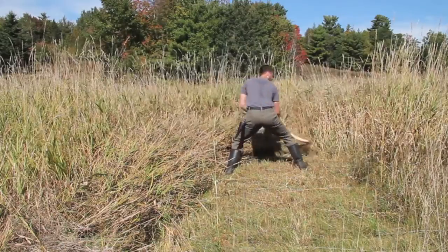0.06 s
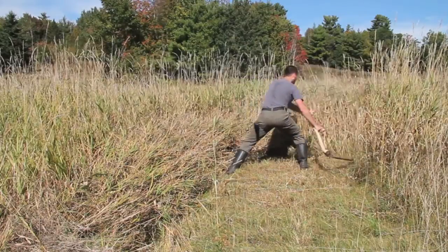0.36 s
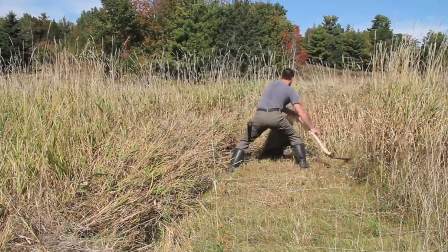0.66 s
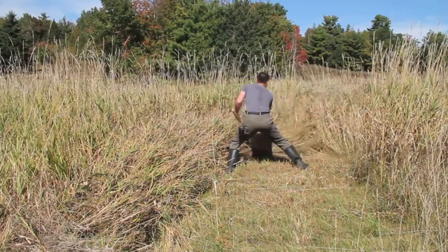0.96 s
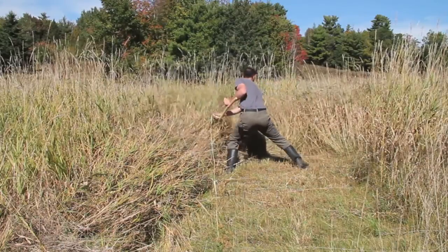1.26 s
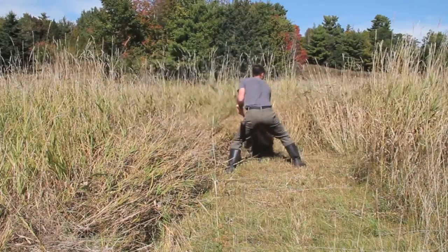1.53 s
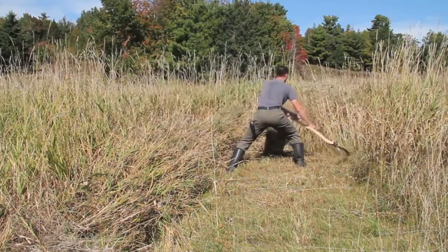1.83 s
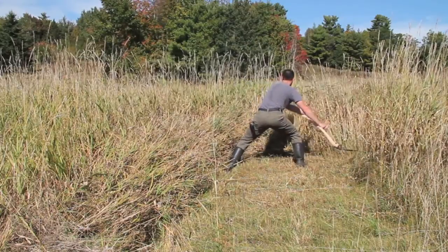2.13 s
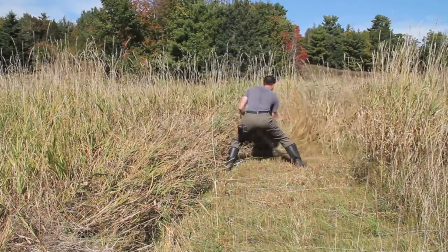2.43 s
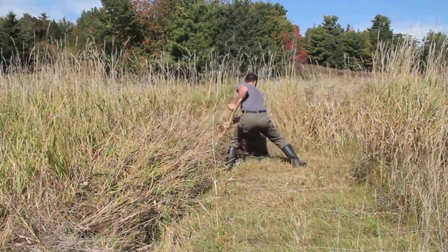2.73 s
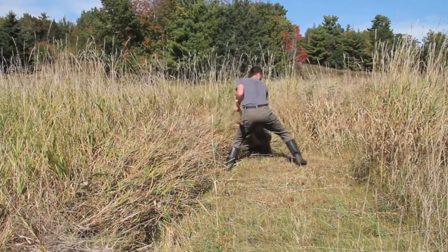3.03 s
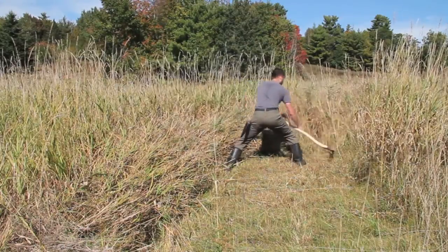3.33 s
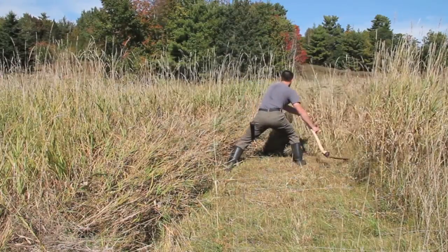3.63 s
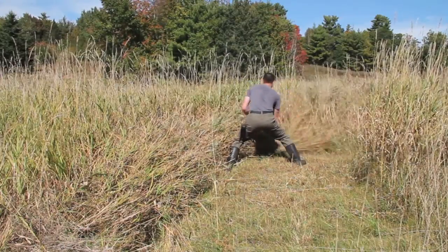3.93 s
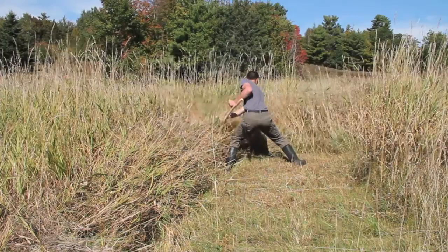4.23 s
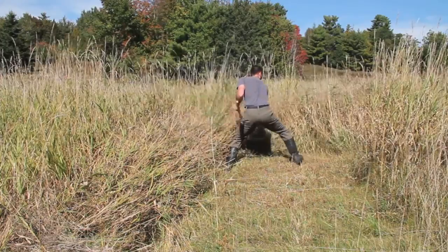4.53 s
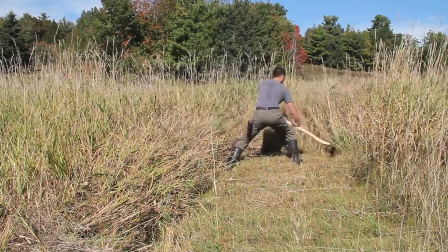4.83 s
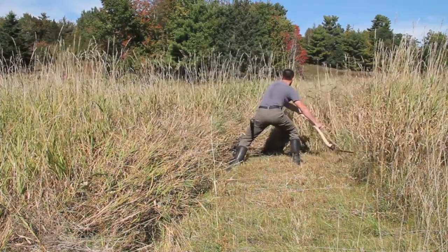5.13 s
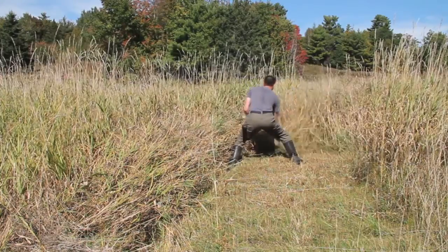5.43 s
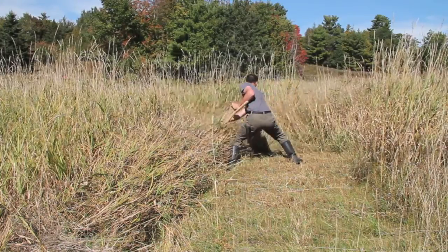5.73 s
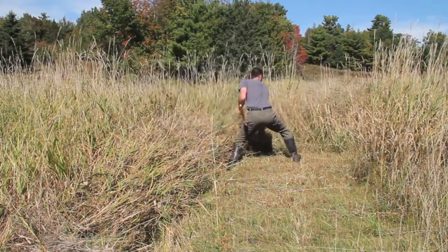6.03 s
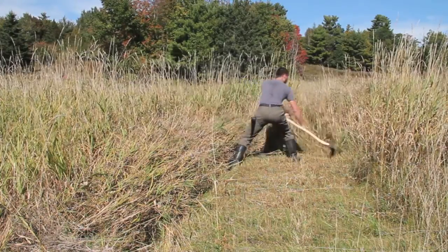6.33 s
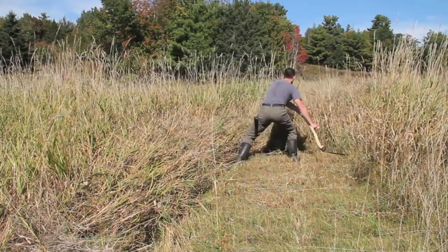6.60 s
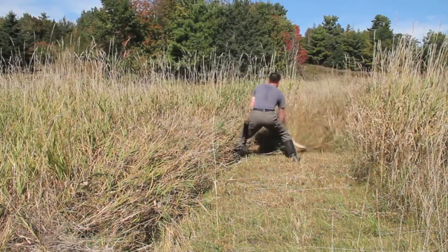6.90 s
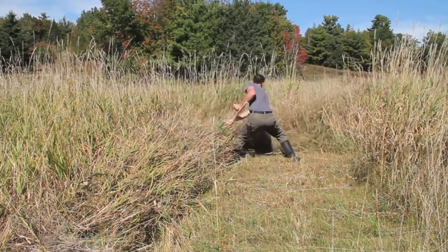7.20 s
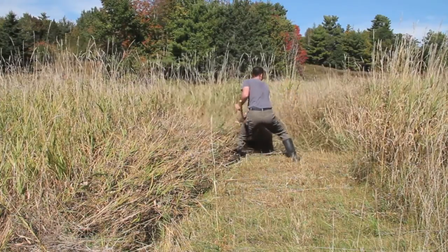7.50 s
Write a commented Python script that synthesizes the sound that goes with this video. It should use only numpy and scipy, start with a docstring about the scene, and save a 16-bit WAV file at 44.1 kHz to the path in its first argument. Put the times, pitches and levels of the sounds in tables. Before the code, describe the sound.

A scythe cuts through tall dry grass in five steady, crackling swishes, with softer rustling as the blade is drawn back.

```python
"""Mowing dry grass with a scythe

Five strokes cut tall dry grass in an open field, heard in mono from a few metres behind the mower.
In each stroke the blade rips through hundreds of stalks, which tug at their roots and make the steel
ring faintly. The cut grass rustles down, and the blade is drawn back over the stubble.
The wooden handle knocks now and then, a light wind touches the microphone and something hums far away."""
import sys
import numpy as np
from scipy import signal
from scipy.io import wavfile
from scipy.ndimage import uniform_filter1d

SR = 44100
rng = np.random.default_rng(int(sys.argv[2]) if len(sys.argv) > 2 else 0)


def transcribe(signal):
    """Save signal, clipped to [-1, 1], as a 16-bit WAV file at the path in sys.argv[1]."""
    frames = np.atleast_2d(signal).T
    limited = np.clip(frames, -1, 1)
    pcm = np.round(limited * 32767).astype(np.int16)
    wavfile.write(sys.argv[1], SR, pcm)


N = 333396
TIME = np.arange(N) / SR

# The cutting strokes. Each row: start, rise time and time in the grass in seconds; levels of ripping,
# root tugging and rustling in dB; seconds until the cut grass has fallen; its fading in dB per second.
STROKES = [(0.684, 0.23, 0.38, -36.5, -46.5, -32, 0.52, 33), (2.25, 0.1, 0.48, -38, -46.5, -33.5, 0.49, 66),
           (3.723, 0.33, 0.46, -37.8, -48.5, -30.5, 0.5, 37.5),
           (5.284, 0.13, 0.42, -37, -47, -34.5, 0.47, 53), (6.775, 0.2, 0.5, -39, -50, -33.5, 0.51, 64)]
# Thick clumps (+) and thin patches (-). Each row: time and half width in seconds, level change in dB.
CLUMPS = [(0.789, 0.0066, 5), (0.979, 0.011, 0), (1.045, 0.013, 2), (2.325, 0.057, 2), (2.482, 0.048, -3),
          (2.562, 0.026, 1.6), (2.627, 0.01, 3), (2.717, 0.026, -2), (3.915, 0.018, 7), (3.969, 0.018, 3),
          (4.077, 0.0064, 4), (4.134, 0.048, -3), (5.364, 0.015, 4.5), (5.615, 0.037, 4), (5.727, 0.036, 4),
          (7.085, 0.018, -2), (7.138, 0.015, 2.5), (7.188, 0.023, -2)]
# Tufts jerking at their roots. Each row: time in seconds, peak level in dB, pitch in Hz.
TUFTS = [(0.885, -42, 230), (2.404, -43, 242), (2.615, -35.5, 295), (2.664, -35, 295), (2.738, -38, 527),
         (3.978, -39, 332.6), (4.025, -41.5, 240), (4.068, -36.5, 330), (4.189, -40, 306), (7.03, -42, 250),
         (7.234, -39, 266), (7.31, -43, 260)]
# Thick stalks splintering. Each row: time in seconds, peak level in dB, pitch in Hz.
CRACKS = [(0.7813, -33, 3050), (0.9714, -20, 6550), (0.9823, -21, 4600), (1.04, -20, 2980),
          (2.3094, -26.5, 2420), (2.6664, -25, 8070), (3.907, -35, 4710), (4.0533, -23, 2980),
          (4.074, -20.5, 3140), (4.884, -28.5, 4270), (5.415, -20, 7440), (5.42, -24, 8090),
          (5.4613, -23, 5390), (5.607, -18, 7600), (5.6917, -26, 3060), (5.7129, -20, 5230),
          (7.028, -25, 4000), (7.046, -22, 3240), (7.083, -27, 3320), (7.117, -25, 2940),
          (7.14, -25.5, 2180)]
# Brittle stems snapping clean through. Each row: time in seconds, peak level in dB, pitch in Hz.
SNAPS = [(0.8726, -15.5, 5000), (2.2878, -18, 5500), (3.068, -22, 9300), (3.863, -22, 8500),
         (4.022, -25, 5500), (4.0358, -16, 6460), (6.4541, -4.5, 8800), (6.983, -6, 7400)]
# The blade is drawn back. Each row: start and length in seconds, rustle and sliding levels in dB.
RETURNS = [(-0.152, 0.52, -40.5, -52), (1.373, 0.46, -41.5, -54.5), (2.875, 0.35, -41.5, -60),
           (3.248, 0.26, -40.5, -51.5), (4.36, 0.63, -43, -57.5), (5.808, 0.69, -42, -53.5),
           (7.327, 0.3, -41, -54)]
# The scythe sweeps past standing grass. Each row: time and half width in seconds,
# then rustle level, change of its top treble and sliding level, all in dB.
BRUSHES = [(0.228, 0.018, -40.5, 3, -48), (1.729, 0.082, -40.5, 5, -68), (1.914, 0.084, -59, 0.3, -51),
           (2.153, 0.072, -53, 3, -59), (3.076, 0.047, -49, 2, -51), (3.434, 0.047, -43.1, 3, -50),
           (4.736, 0.072, -36.5, 4, -68), (4.888, 0.059, -40.5, -6, -48.5), (4.959, 0.044, -49.7, -6, -47),
           (5.094, 0.046, -49, 3, -55.4), (6.253, 0.048, -39.5, -1, -67), (6.74, 0.12, -47.5, 4, -57)]
# The blade skims the stubble on its way into the grass. Each row: time in seconds, level in dB.
ENTRIES = [(0.756, -56), (2.262, -52), (3.801, -49), (5.326, -46.5), (6.842, -45)]
# The tones at which the steel rings. Each row: pitch in Hz, width in Hz, level in dB.
BLADE_TONES = [(909, 21, 3), (1056, 91, -0.5), (1540, 62, 1), (1823, 59, 1), (2000, 12, -9.5),
               (2435, 67, -5), (3050, 100, -9), (3927, 66, 0.5), (4520, 25, -1)]
# The blade taps something hard. Each row: time in seconds, peak level in dB, rough pitch in Hz.
CLINKS = [(0.3467, -31.5, 2260), (0.734, -42, 4650), (0.785, -43, 3000), (2.333, -30, 3950),
          (2.669, -34, 3200), (3.763, -46, 4540), (3.806, -41, 1540), (3.911, -33, 2450),
          (4.955, -37, 3500), (5.312, -42, 1770), (5.358, -32, 2130), (5.415, -27, 3900),
          (5.524, -36, 1570), (5.645, -34, 1060), (6.474, -44, 2000), (6.834, -41, 3100)]
# Knocks of the handle. Each row: time in seconds, strength in dB, pitch in Hz, fade time in cycles.
KNOCKS = [(0.1902, -29.5, 392, 0.21), (1.568, -41, 425, 0.78), (3.237, -47, 500, 0.33),
          (3.345, -41, 1000, 0.61), (6.208, -48, 382, 0.6)]
# Gusts on the microphone. Each row: start, rise time and length in seconds, level in dB.
GUSTS = [(0.25, 0.1, 0.14, -75), (2.25, 0.12, 0.51, -80), (3.5, 0.2, 0.45, -71), (2.8, 0.19, 0.5, -69),
         (5.3, 0.13, 0.7, -79), (6.08, 0.06, 0.12, -63), (6.6, 0.04, 0.09, -55), (6.88, 0.24, 0.66, -52.5)]
# Single puffs of wind. Each row: time in seconds, peak level in dB, pitch in Hz, fade time in cycles.
PUFFS = [(2.865, -56, 69.6, 0.3), (3.23, -52, 65.4, 0.52), (3.283, -53, 95, 0.36), (3.76, -54, 46, 0.28),
         (6.135, -52, 83, 0.25), (6.618, -46, 119, 0.44), (7.131, -39, 100, 0.35),
         (7.184, -38.5, 130, 0.43), (7.488, -47, 91, 0.49)]

# A colour says how strong a noise is from bass to treble. Each row: frequency in Hz, level in dB.
RIP_COLOUR = [(300, 0.5), (700, -2), (1200, -2), (1800, 2), (3200, 2.5), (5000, 3.5), (8000, -5),
              (15000, -3.5)]   # tearing stalks
TUG_COLOUR = [(70, -18), (150, -9.5), (230, 4), (300, -4), (450, 1.5), (700, 1.5), (1500, -35)]   # pulled roots
RUSTLE_COLOUR = [(200, -40), (600, -15), (1500, -9.5), (3000, -4), (5000, -1.5), (8200, 0.5), (10500, -3.5),
                 (14000, -7.5), (16000, -3)]   # dry leaves touching
SLIDE_COLOUR = [(150, -9), (400, -3), (800, -10.5), (1600, 0.5), (3000, -3.5), (6000, -4), (15000, -37)]   # steel on stubble
WIND_COLOUR = [(22, -17), (50, 11), (95, 3), (160, -1.5), (300, -30), (600, -39)]   # air on the microphone
FIELD_COLOUR = [(40, -26), (90, 2), (150, -1.5), (280, -2), (600, 1.5), (1300, -1), (2500, -11.5),
                (8000, -6.5), (16000, -16.5)]   # the hush of the field


def cutting():
    """Stalks tear and pop in quick bunches and set the blade ringing; each bunch plucks at the turf."""
    bites, pulls = [], []
    for start, rise_s, length_s, rip_db, tug_db, *_ in STROKES:
        bites.append(from_db(rip_db) * movement(start, rise_s, length_s, fade_db_per_s=139))
        # The roots are only pulled once the blade has bitten fully, so this rises later.
        pulls.append(from_db(tug_db) * movement(start, rise_s, length_s, fade_db_per_s=343, curve=1.76))
    thickness = from_db(thickness_db())
    late_breaks = [from_db(-19) * gain for _, gain in falling_grass()]   # stalks break as they fall
    rip_gain = together([together(bites) * thickness] + late_breaks)
    tug_gain = together(pulls) * thickness
    rips = crackle(RIP_COLOUR, per_s=1100, spread_db=3, colour_db=17, decay_s=0.0015, even_s=0.087)
    pops = straw_pops(low_hz=1000, high_hz=5500, per_s=200, sharpness=91, spread_db=3, pitches=44)
    blade = rips + from_db(-6.5) * pops + from_db(-7) * rms_one(steel(rips))
    tugs = crackle(TUG_COLOUR, per_s=320, spread_db=2.5, colour_db=2.5, decay_s=0.0027, even_s=0.04)
    turf = tugs + from_db(0.5) * resonance(tugs, hz=330, width_hz=70)
    jerks = thuds([(start, db, hz, 0.76) for start, db, hz in TUFTS])   # fade time: 0.76 cycles
    return rip_gain * rms_one(blade) + tug_gain * rms_one(turf) + jerks


def straw_pops(low_hz, high_hz, per_s, sharpness, spread_db, pitches):
    """Each hollow straw pops at the pitch of its own tube as it is cut."""
    sizes = from_db(spread_db * np.minimum(rng.exponential(1, N), 3)) * rng.choice([-1, 1], N)
    pops = sizes * (rng.random(N) < per_s / SR)
    tube = rng.integers(0, pitches, N)
    rings = sum(resonance(pops * (tube == k) + 1e-18, hz, hz / sharpness) / np.sqrt(hz)
                for k, hz in enumerate(np.geomspace(low_hz, high_hz, pitches)))
    return evened(rings, even_s=0.097)


def thickness_db():
    """How much grass the blade meets, in dB above or below evenly grown grass."""
    return sum(db * bump(centre, half_width_s) for centre, half_width_s, db in CLUMPS)


def falling_grass():
    """Cut grass moves just after the first stalks break, then settles. Gives (start, gain) per stroke."""
    thickness = from_db(0.86 * thickness_db())
    return [(start, thickness * from_db(db) * movement(start, rise_s, fall_s, fade, curve=1.39))
            for start, rise_s, _, _, _, db, fall_s, fade in STROKES]


def rustle():
    """Thousands of light touches a second merge to a hiss; the finest leaves add the top treble."""
    # Each stir is a gain and a treble change in dB. Cut grass starts dull and brightens as it falls.
    stirs = [(gain, np.interp(TIME, [start, start + 0.55], [-4.5, 2.4]))
             for start, gain in falling_grass()]
    stirs += [(from_db(db) * movement(start, 0.13, length_s, fade_db_per_s=91), 1)
              for start, length_s, db, _ in RETURNS]
    stirs += [(from_db(db) * bump(centre, half_width_s), top_db)
              for centre, half_width_s, db, top_db, _ in BRUSHES]
    stirs += [(from_db(-55), -0.5)]   # the standing grass never quite stops stirring
    body_gain = together(gain for gain, _ in stirs)
    top_gain = together(gain * from_db(top_db) for gain, top_db in stirs)
    touches = crackle(RUSTLE_COLOUR, per_s=14000, spread_db=1.5, colour_db=5,
                      decay_s=0.00016, even_s=0.072)
    top = signal.sosfiltfilt(signal.butter(3, 10000, "high", fs=SR, output="sos"), touches)
    return body_gain * (touches - top) + top_gain * top


def cracks(decay_s, reach_octaves):
    """A thick stalk splinters for a few milliseconds around a pitch of its own."""
    out, t = np.zeros(N), TIME[:SR // 20]
    for start, db, hz in CRACKS:
        splinters = rng.standard_normal(len(t)) * np.exp(-t / decay_s)
        crack = band(splinters, hz / 2 ** reach_octaves, hz * 2 ** reach_octaves, order=1)
        add(out, start, from_db(db) * peak_one(crack))
    return out


def snaps(scatter_db, scatter_s):
    """A brittle stem gives one sharp pulse, which scatters off the ground and the stalks around."""
    out, t = np.zeros(N), TIME[:SR // 30]
    for start, db, hz in SNAPS:
        pulse = from_db(scatter_db) * rng.standard_normal(len(t)) * np.exp(-t / scatter_s)
        pulse[0] = 1
        snap = band(pulse, hz * 0.56, hz * 1.5, order=1)
        add(out, start, from_db(db) * peak_one(band(snap, 530, 11100, order=5)))
    return out


def sliding():
    """The back of the blade flicks over the stubble and rings a little."""
    slides = [from_db(db) * movement(start, 0.13, length_s, fade_db_per_s=68)
              for start, length_s, _, db in RETURNS]
    slides += [from_db(db) * bump(centre, half_width_s) for centre, half_width_s, _, _, db in BRUSHES]
    slides += [from_db(db) * bump(centre, half_width_s=0.025) for centre, db in ENTRIES]
    flicks = crackle(SLIDE_COLOUR, per_s=1200, spread_db=0, colour_db=2.5, decay_s=0.0023, even_s=0.065)
    ringing = from_db(-17) * rms_one(steel(flicks))
    return together(slides) * rms_one(flicks + ringing)


def clinks(reach_octaves, scrape_db, scrape_s):
    """A tap with a short scrape; where it lands decides which tones of the blade ring most."""
    out, t = np.zeros(N), TIME[:SR // 8]
    for start, db, hz in CLINKS:
        contact = from_db(scrape_db) * rng.standard_normal(len(t)) * np.exp(-t / scrape_s)
        contact[0] = 1
        push = band(contact, hz / 2 ** reach_octaves, hz * 2 ** reach_octaves)
        add(out, start, from_db(db) * peak_one(steel(push)))
    return out


def steel(push):
    """A push makes the blade ring at its own tones."""
    return sum(from_db(db) * resonance(push, hz, width_hz) for hz, width_hz, db in BLADE_TONES)


def handle():
    """The wooden handle knocks hollowly; it is too slim to give off deep bass."""
    return band(thuds(KNOCKS), low_hz=150, high_hz=3000)


def wind():
    """Moving air rumbles and thumps on the microphone, with a light breeze between the gusts."""
    gusts = [from_db(db) * movement(start, rise_s, length_s, fade_db_per_s=180)
             for start, rise_s, length_s, db in GUSTS]
    breeze = from_db(-80.5)
    rumble = crackle(WIND_COLOUR, per_s=120, spread_db=9, colour_db=-10, decay_s=0.01, even_s=0.094)
    return together(gusts + [breeze]) * rumble + thuds(PUFFS)


def field_hush():
    """The open field gives a soft, steady noise."""
    hush = sum(gain * band(rng.standard_normal(N), low, high) for low, high, gain in thirds(FIELD_COLOUR))
    return from_db(-57.5) * rms_one(hush)


def distant_hum(hz, width_hz):
    """A faint, wavering low tone comes from beyond the field."""
    tone = resonance(rng.standard_normal(N), hz, width_hz)
    return from_db(-79.5) * rms_one(resonance(tone, hz, width_hz))


def crackle(colour, per_s, spread_db, colour_db, decay_s, even_s):
    """A shower of tiny noise bursts; spread_db varies their size, colour_db each band within a burst."""
    starts = np.flatnonzero(rng.random(N) < per_s / SR)
    size_db = spread_db * np.minimum(rng.exponential(1, N), 4)[starts]
    kept = np.exp(-2 / (decay_s * SR))   # share of the energy left after one sample
    out = 0
    for low, high, gain in thirds(colour):
        energy = np.zeros(N)
        energy[starts] = from_db(size_db + colour_db * rng.uniform(-1.53, 1, N)[starts]) ** 2
        energy = signal.lfilter([1], [1, -kept], energy + 1e-18)
        out = out + gain * band(np.sqrt(energy) * rng.standard_normal(N), low, high)
    return evened(out, even_s)


def thuds(table):
    """Soft blows that swell and die within a few cycles."""
    out, t = np.zeros(N), TIME[:SR // 8]
    for start, db, hz, cycles in table:
        blow = np.sin(2 * np.pi * hz * t) * t ** 2 * np.exp(-t * hz / cycles)
        add(out, start, from_db(db) * peak_one(blow))
    return out


def movement(start, rise_s, length_s, fade_db_per_s, curve=1):
    """The gain of one movement: it gathers speed, holds, and dies away after its length."""
    t = TIME - start
    rise = np.clip(t / rise_s, 0, 1) ** curve
    fade_db = np.minimum(fade_db_per_s * np.maximum(t - length_s, 0), 200)
    return rise * from_db(-fade_db)


def bump(centre, half_width_s):
    """A bell-shaped swell of height 1."""
    return np.exp(-np.minimum(((TIME - centre) / half_width_s) ** 2, 50))


def thirds(colour):
    """Split a colour into bands a third of an octave wide: low edge in Hz, high edge in Hz, gain."""
    hz, db = np.transpose(colour)
    edges = 20 * 2 ** (np.arange(30) / 3)
    centres = np.sqrt(edges[:-1] * edges[1:])
    gains = from_db(np.interp(np.log(centres), np.log(hz), db))
    return [(low, high, gain) for low, high, gain in zip(edges, edges[1:], gains)
            if high > hz[0] and low < hz[-1]]


def band(x, low_hz, high_hz, order=2):
    """Let through what lies between two frequencies."""
    sos = signal.butter(order, [low_hz, min(high_hz, .45 * SR)], "band", fs=SR, output="sos")
    return signal.sosfilt(sos, x + 1e-18)


def resonance(x, hz, width_hz):
    """Ring at one pitch; the smaller the width, the longer the ring."""
    r = np.exp(-np.pi * width_hz / SR)
    feedback = [1, -2 * r * np.cos(2 * np.pi * hz / SR), r * r]
    return signal.lfilter(np.array([1, 0, -1]) * (1 - r * r) / 2, feedback, x)


def together(gains):
    """Combine the gains of unrelated sounds: their powers add up."""
    return np.sqrt(sum(gain ** 2 for gain in gains))


def evened(x, even_s):
    """Hold the average level near 1 over every stretch of even_s seconds."""
    power = uniform_filter1d(x ** 2, int(even_s * SR) + 1)
    return x / np.sqrt(np.abs(power) + 1e-20)


def rms_one(x):
    """Scale to an average level (rms) of 1."""
    return x / np.sqrt(np.mean(x ** 2) + 1e-20)


def peak_one(x):
    """Scale to a peak of 1."""
    return x / np.max(np.abs(x))


def from_db(db):
    """Turn decibels into a gain, the number a sound is multiplied by."""
    return 10 ** (np.asarray(db) / 20)


def add(track, start, sound):
    """Mix a short sound in at a time in seconds."""
    at = int(np.clip(round(start * SR), 0, N - 1))
    track[at:at + len(sound)] += sound[:N - at]


def scene():
    """The mower is straight ahead, so both channels are alike."""
    stalks = cracks(decay_s=0.006, reach_octaves=0.16) + snaps(scatter_db=-21, scatter_s=0.0018)
    scythe = clinks(reach_octaves=0.17, scrape_db=-17, scrape_s=0.01) + handle()
    mowing = rustle() + cutting() + sliding() + stalks + scythe
    mono = mowing + wind() + field_hush() + distant_hum(hz=148.7, width_hz=4.2)
    return np.array([mono, mono])


def record(dry):
    """The microphone lifts a narrow treble band, dips just above it and cuts the very top steeply."""
    lift = from_db(-13) * resonance(dry, hz=8400, width_hz=950)
    dip = from_db(-19.5) * resonance(dry, hz=9700, width_hz=1700)
    top_cut = signal.ellip(12, .1, 80, 15850, fs=SR, output="sos")
    return signal.sosfilt(top_cut, dry + lift - dip)


dry = scene()
out = record(dry)
transcribe(out)
```